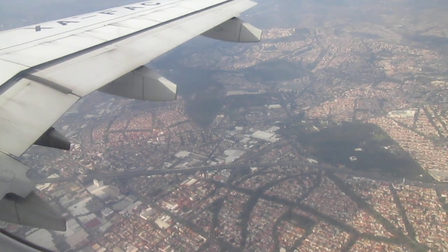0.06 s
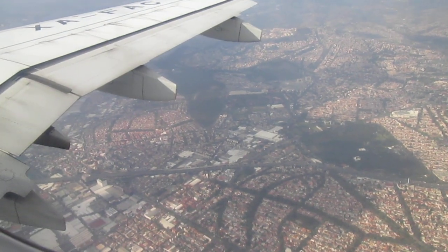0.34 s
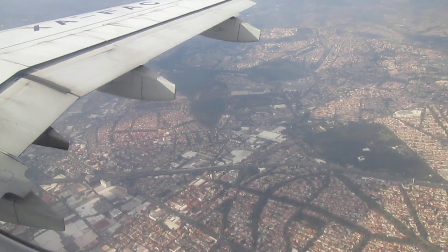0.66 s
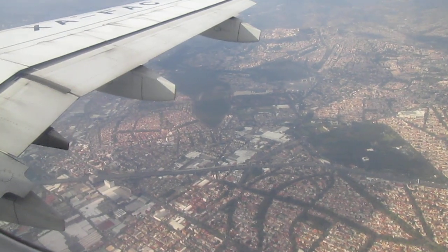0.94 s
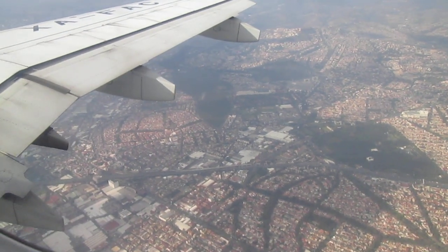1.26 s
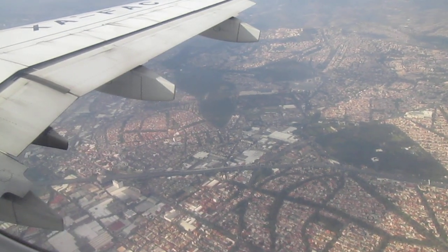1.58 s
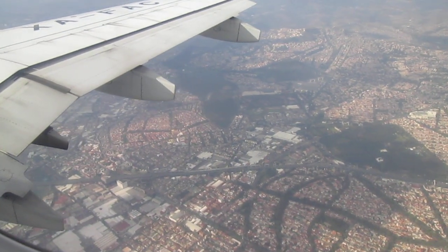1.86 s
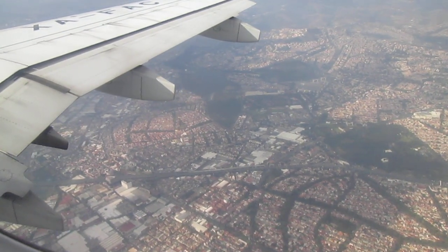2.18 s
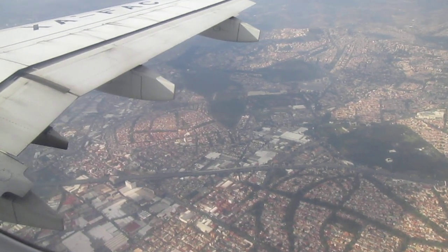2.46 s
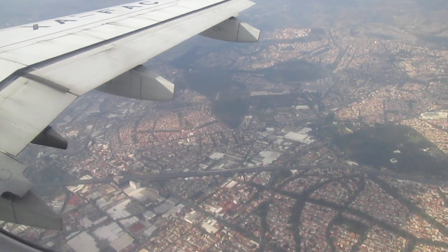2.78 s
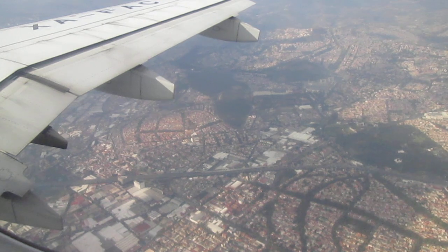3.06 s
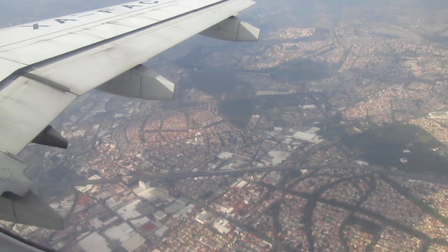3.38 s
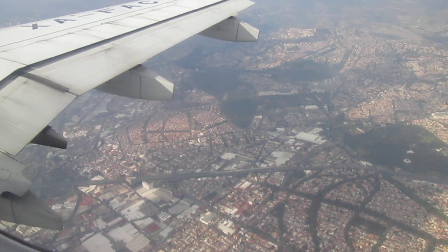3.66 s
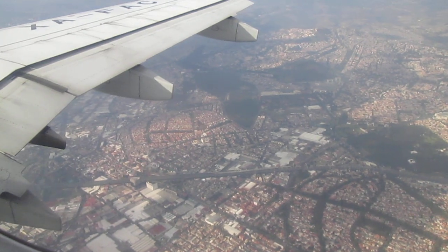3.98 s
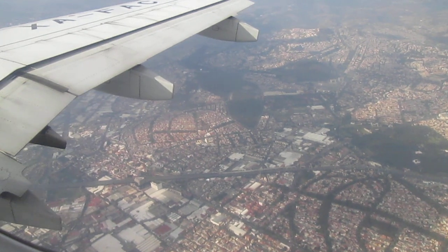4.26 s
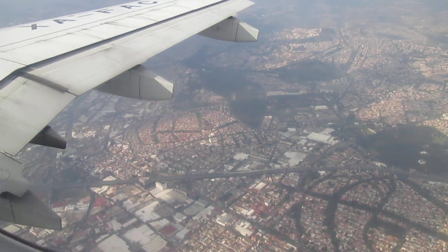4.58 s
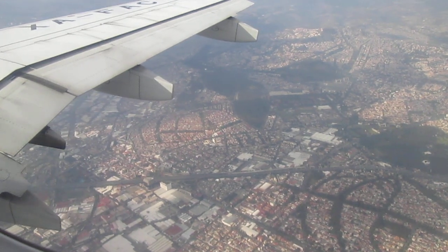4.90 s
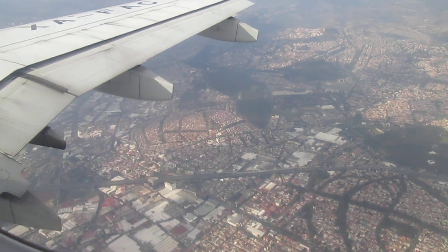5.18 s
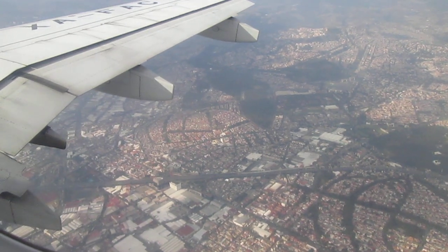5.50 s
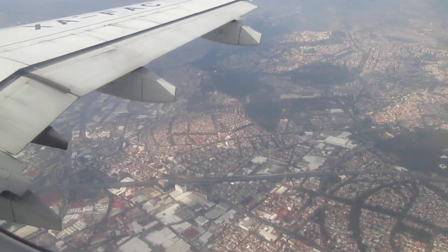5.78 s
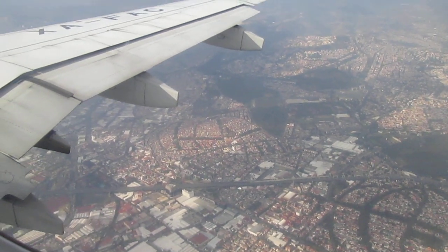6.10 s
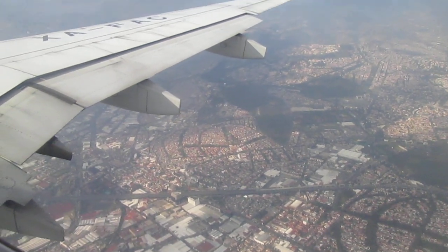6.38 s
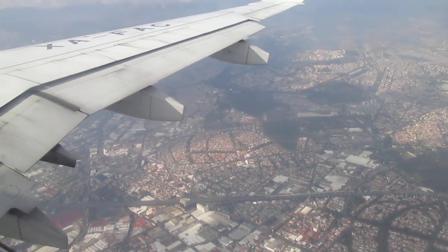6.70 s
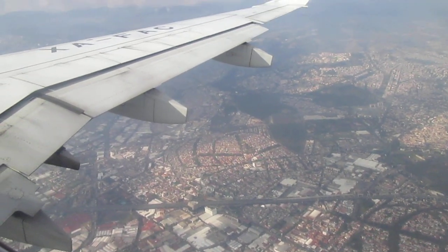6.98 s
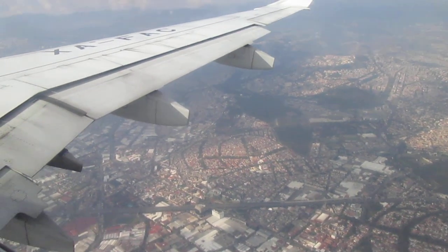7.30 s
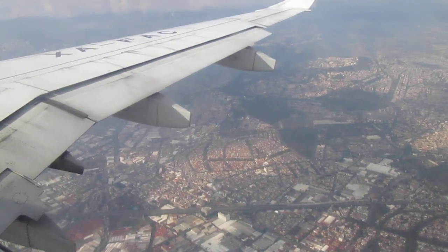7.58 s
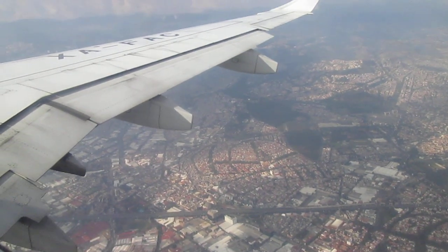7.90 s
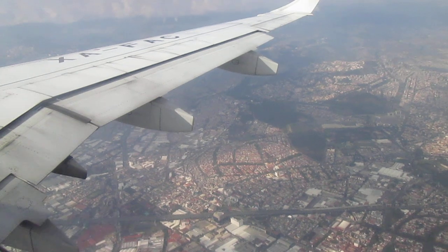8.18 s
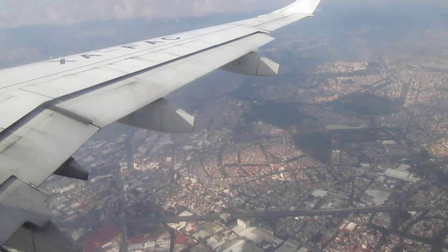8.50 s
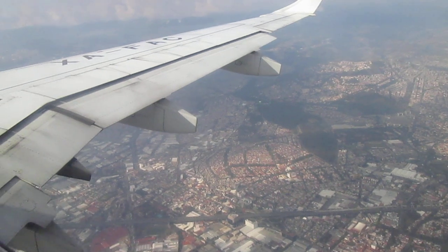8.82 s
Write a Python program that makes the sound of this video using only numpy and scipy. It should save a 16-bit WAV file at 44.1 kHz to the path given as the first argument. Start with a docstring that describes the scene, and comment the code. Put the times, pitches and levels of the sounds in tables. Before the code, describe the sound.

Inside a flying airliner, jet engines drone low and even under a wash of air and a faint fixed-pitch whine.

```python
"""A deep engine rumble and the rush of air along the skin of an airliner in steady flight.
The microphone is at a window seat behind the wing, where jet noise comes through the fuselage.
The engine shafts hum, two nearly matched rotors whine and beat, and a ventilation fan tone wavers.
Rumble, rush and whine dip briefly now and then; the plastic cabin trim slips in faint ticks."""
import sys
import numpy as np
from scipy import signal
from scipy.fft import rfft, irfft
from scipy.io import wavfile

SR = 44100
rng = np.random.default_rng(int(sys.argv[2]) if len(sys.argv) > 2 else 0)


def master(y):
    """Save y as 16-bit WAV."""
    cut = np.clip(np.atleast_2d(y).T, -1, 1)
    pcm = np.round(cut * 32767)  # scale
    wavfile.write(sys.argv[1], SR, pcm.astype(np.int16))


N = 399105
TIME = np.arange(N) / SR
FREQS = np.maximum(np.fft.rfftfreq(N, 1 / SR), 1)


def undb(db):
    """Decibels to gain."""
    return 10 ** (np.asarray(db) / 20)


def curve(table, column=1):
    """One column of a timed table, joined by straight lines."""
    rows = np.array(table)
    return np.interp(TIME, rows[:, 0], rows[:, column])


def colour(points):
    """A spectrum in dB from (Hz, dB) points joined on a log-frequency axis."""
    hz, db = np.transpose(points)
    return np.interp(np.log(FREQS), np.log(hz), db)


def bell(centre_hz, width_hz):
    """Resonance curve, one at its centre."""
    return 1 / (1 + (2 * (FREQS - centre_hz) / width_hz) ** 2)


def noise(spectrum_db):
    """Noise with the given spectral shape, rms one."""
    shaped = irfft(rfft(rng.standard_normal(N)) * undb(spectrum_db), N)
    return shaped / np.sqrt(np.mean(shaped ** 2))


def drift(rate_hz):
    """Smooth random wander up to about rate_hz, rms one."""
    return noise(-10 * np.minimum((np.fft.rfftfreq(N, 1 / SR) / rate_hz) ** 2, 20))


def turning(hz, drift_hz, rate_hz):
    """Phase of a spinning part whose speed wanders slightly."""
    wandering_hz = hz + drift_hz * drift(rate_hz)
    return 2 * np.pi * (np.cumsum(wandering_hz) / SR + rng.random())


def rumble(level_db=-14.0, buffet_db=.2):
    """Jet noise shakes the fuselage; a few panels ring, and turbulence makes it swell a little."""
    # engine spectrum from inside the cabin: frequency_hz, relative_db
    spectrum = [(10, -29), (21, -11.5), (41, -13), (51, -1.5), (64, 1), (85, -3.6), (104, 0), (176, -.2),
                (205, -7), (262, -11.3), (390, -11.8), (450, -16.1), (640, -26), (1000, -52)]
    # panel resonances: centre_hz, width_hz, lift_db
    panels = [(135, 9, 1.5), (168, 12, 2), (241, 8, 6), (333, 10, 3), (383, 22, 2), (470, 16, 2.5),
              (565, 30, 2)]
    ringing_db = sum(lift_db * bell(hz, width_hz) for hz, width_hz, lift_db in panels)
    lining_db = -10 * np.log10(1 + (FREQS / 1500) ** 6)  # the wall lining stops the treble
    return noise(colour(spectrum) + ringing_db + lining_db) * undb(level_db + buffet_db * drift(4))


def airflow(level_db=-35.5, flutter_db=.2):
    """The boundary layer hisses on the skin just outside the window, fluttering as eddies pass."""
    # spectrum of the rushing air: frequency_hz, relative_db
    spectrum = [(300, -12), (740, -.6), (1000, -3.6), (1330, -10.5), (1680, -9.5), (2300, -15.8),
                (2900, -22.3), (3500, -22.2), (4100, -28), (4750, -30), (5300, -34.3), (6800, -35),
                (7300, -37.3), (14400, -44.4), (15600, -50)]
    return noise(colour(spectrum)) * undb(level_db + flutter_db * drift(14))


def shafts(shaft_hz=52.66, hum_gain_db=-.5, octave_db=-32.0):
    """Unbalance of the engine shafts: a deep hum that swells and sinks under a steady octave."""
    # swell of the hum: time_s, relative_db
    hum_levels = [(0.0, -19.5), (0.8, -25.2), (1.9, -20.5), (2.35, -27.0), (3.1, -22.2), (5.45, -22.2),
                  (5.85, -35.7), (6.9, -29.4), (7.4, -21.5), (7.8, -33.2), (8.35, -24.4), (9.05, -35.2)]
    phase = turning(shaft_hz, drift_hz=.06, rate_hz=1)
    hum = undb(curve(hum_levels) + hum_gain_db) * np.sin(phase)
    return np.sqrt(2) * (hum + undb(octave_db) * np.sin(2 * phase))


def rotor(blade_hz, harmonics_db, drift_hz, shimmer_db):
    """A governed rotor whines on its blade rate; moving air makes each harmonic shimmer."""
    phase = turning(blade_hz, drift_hz, rate_hz=2)
    return np.sqrt(2) * sum(undb(db + shimmer_db * drift(6)) * np.sin(k * phase)
                            for k, db in enumerate(harmonics_db, 1))


def hunting(slowest_s=6.38, swing_hz=1.4, period_s=1.35, width_s=.85):
    """A rotor's speed hunts once: a swing of its blade rate, in Hz, that grows and dies away."""
    since = TIME - slowest_s
    return -swing_hz * np.cos(2 * np.pi * since / period_s) * np.exp(-(since / width_s) ** 2)


def rotors(blade_hz=1190.91, lead_hz=5.3):
    """The far rotor runs slightly faster than the near one; their octaves beat about ten times a second."""
    # near rotor's harmonics, fundamental first: relative_db
    near_harmonics = [-37.3, -50, -70.5, -78, -81.5, -91, -90]
    # far rotor's harmonics, fundamental first: relative_db
    far_harmonics = [-55, -50, -79, -74.5, -81.5, -84, -89]
    near = rotor(blade_hz, near_harmonics, drift_hz=.06, shimmer_db=.5)
    far = rotor(blade_hz + lead_hz + hunting(), far_harmonics, drift_hz=.12, shimmer_db=.6)
    return near + far


def fans(pitch_hz=701.1, base_gain_db=.3, first_gain_db=-1.5, second_gain_db=-5.0):
    """An unsteady ventilation fan fades in and out; a second fan's octave beats against its own."""
    # swell of the fan tone: time_s, fundamental_relative_db, octave_relative_db
    fan_levels = [(0.0, -47.3, -57.7), (1.1, -53.1, -52.5), (1.9, -43.7, -49.1), (4.4, -43.6, -47.8),
                  (5.4, -47.5, -50.0), (5.9, -40.2, -50.6), (6.7, -40.3, -47.6), (7.2, -39.8, -59.2),
                  (7.9, -51.5, -58.2), (9.05, -56.1, -58.6)]
    early_beat_hz, trough_s = 1.11, 3.13  # the octaves are in opposite phase at trough_s
    late_beat_hz, parting_s = 2.05, 4.93  # from parting_s on, the two speeds lie further apart
    beat_cycles = early_beat_hz * (np.minimum(TIME, parting_s) - trough_s)
    beat_cycles += late_beat_hz * np.maximum(TIME - parting_s, 0)
    phase = turning(pitch_hz, drift_hz=.9, rate_hz=2)
    fundamental = undb(curve(fan_levels) + base_gain_db) * np.sin(phase)
    first_octave = undb(first_gain_db) * np.sin(2 * phase)
    second_octave = undb(second_gain_db) * np.sin(2 * phase + 2 * np.pi * beat_cycles)
    octaves = undb(curve(fan_levels, column=2)) * (first_octave - second_octave)
    return np.sqrt(2) * (fundamental + octaves)


def level_dips(full_db=1.25, fall_s=.05, hold_s=.22, recovery_db_per_s=4.0):
    """A level curve in dB that falls fast, holds and creeps back; the deepest running dip sets it."""
    # brief dips, before each layer takes its share: start_s, depth_db
    dips = [(-.2, 2.0), (.26, 1.7), (.67, 3.9), (1.76, 1.6), (2.0, 3.1), (3.37, 1.6), (3.72, 3.0),
            (5.63, 2.0), (6.2, 2.1), (7.57, 3.2)]
    sag_db = np.zeros(N)
    for start_s, depth_db in dips:
        fall = np.clip((TIME - start_s) / fall_s, 0, 1)
        regained_db = recovery_db_per_s * np.maximum(TIME - start_s - hold_s, 0)
        sag_db = np.maximum(sag_db, fall * depth_db - regained_db)
    return full_db - sag_db


def trim_ticks(relative_width=1.3):
    """Plastic panels slip against each other in short, dry ticks, each with its own colour."""
    # ticks of the cabin trim: start_s, level_db, decay_s (to -60 dB), centre_hz
    ticks = [(.257, -52, .035, 5500), (3.309, -49.5, .035, 6000), (4.304, -42.5, .13, 2500),
             (4.333, -46.5, .1, 2400), (4.770, -50, .04, 5600), (5.433, -50, .03, 4800),
             (6.164, -46.5, .035, 5200), (8.735, -54, .07, 8000)]
    ticking = np.zeros(N)
    for start_s, level_db, decay_s, centre_hz in ticks:
        envelope = undb(level_db - 60 * np.abs(TIME - start_s) / decay_s) * (TIME >= start_s)
        ticking += envelope * noise(20 * np.log10(bell(centre_hz, relative_width * centre_hz)))
    return ticking


def scene(rumble_share=.75, whine_share=1.05):
    """All sources at the seat, in mono; rumble, air and whine each follow the dips by their own share."""
    level_db = level_dips()
    whine = undb(whine_share * level_db) * rotors()
    roar = undb(rumble_share * level_db) * rumble() + undb(level_db) * airflow()
    return (roar + whine + shafts() + fans() + trim_ticks())[None]


def record(dry, notch_hz=7850, notch_width_hz=150, top_hz=15650, fade_s=.006):
    """The sound fades in and out over a few milliseconds; the microphone chain has a narrow treble notch and
    cuts the top."""
    fade = signal.windows.tukey(N, 2 * fade_s * SR / N)
    notch = signal.iirnotch(notch_hz, notch_hz / notch_width_hz, fs=SR)
    lowpass = signal.ellip(10, .1, 90, top_hz, fs=SR, output="sos")
    return signal.sosfilt(lowpass, signal.lfilter(*notch, dry * fade))


dry = scene()
out = record(dry)
master(out)
```